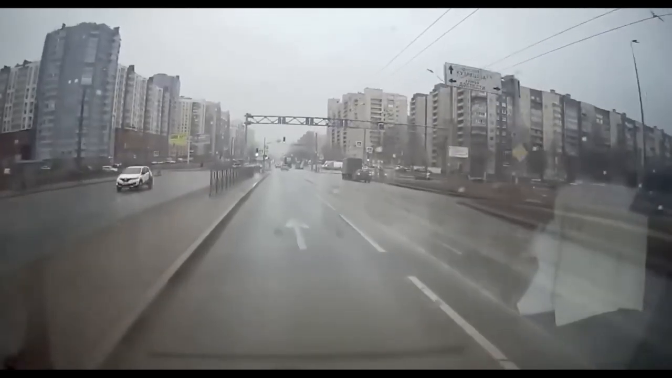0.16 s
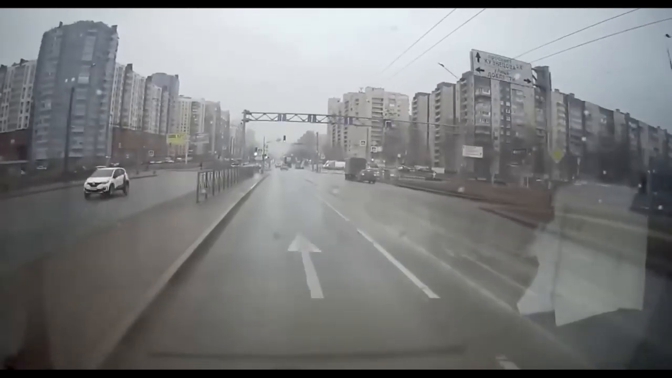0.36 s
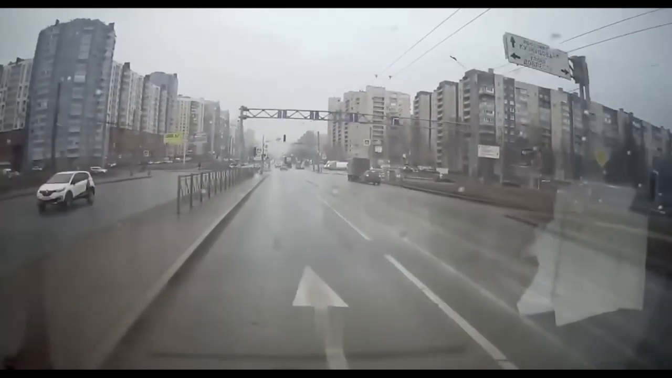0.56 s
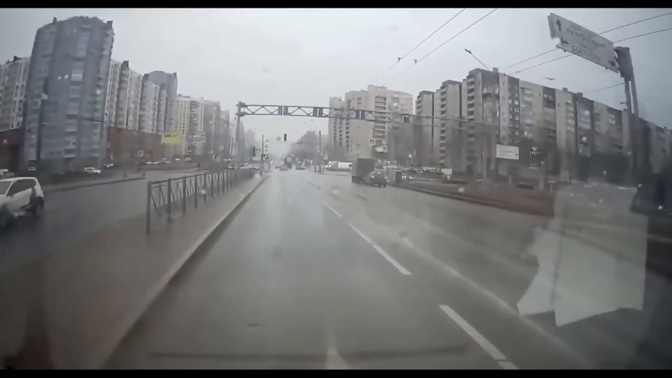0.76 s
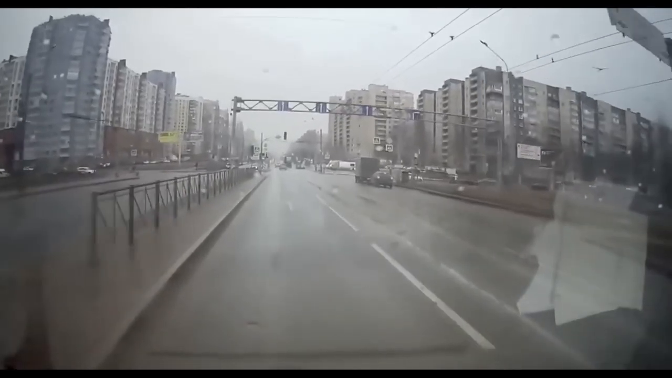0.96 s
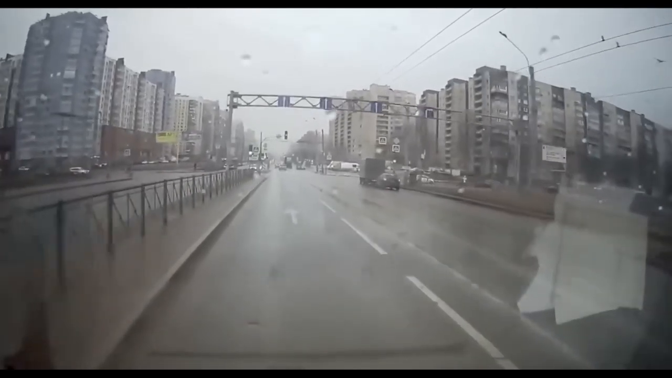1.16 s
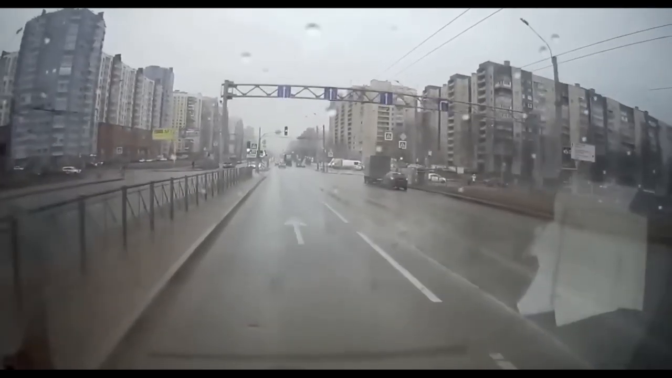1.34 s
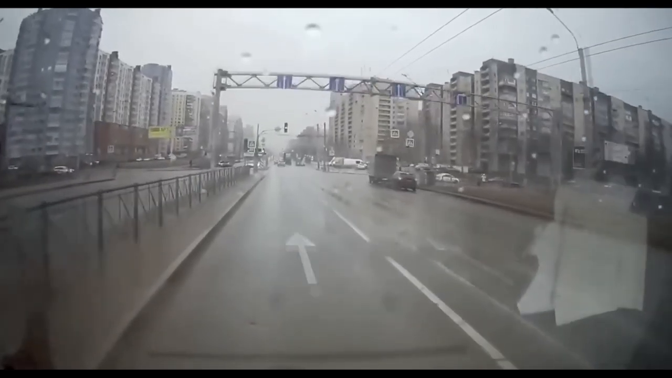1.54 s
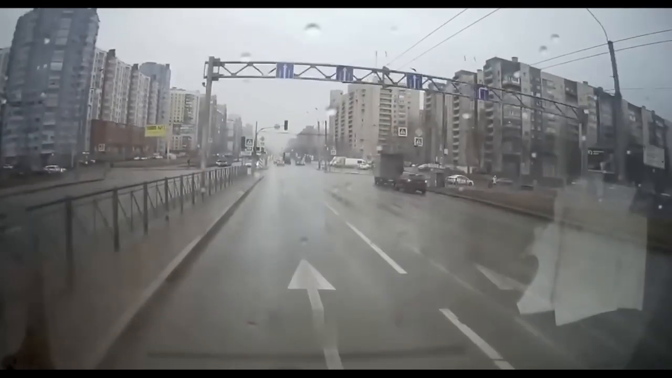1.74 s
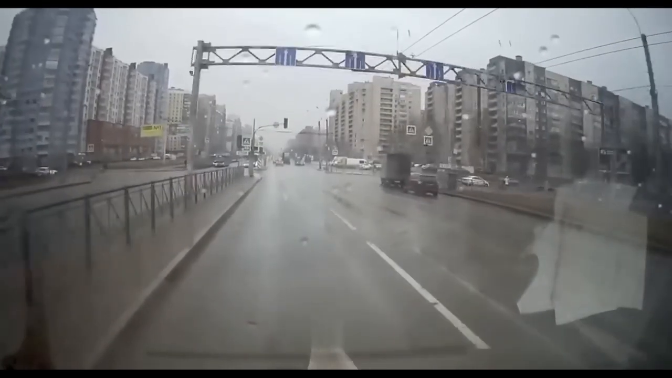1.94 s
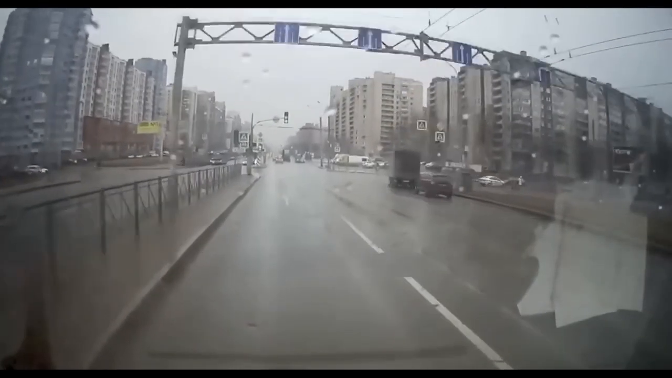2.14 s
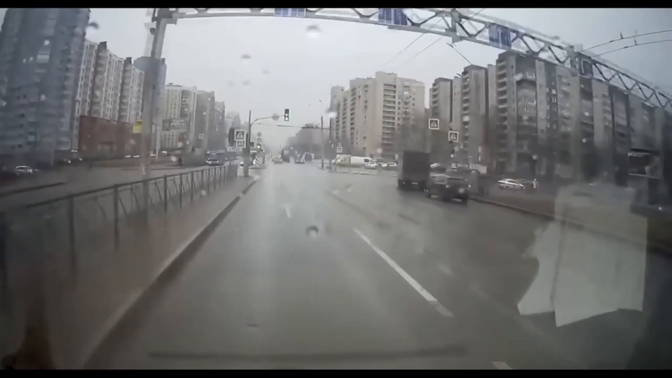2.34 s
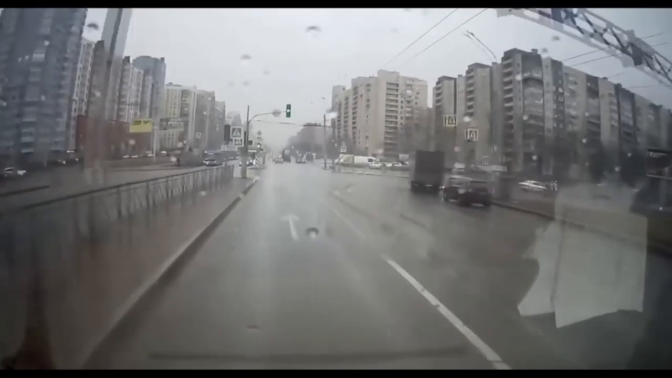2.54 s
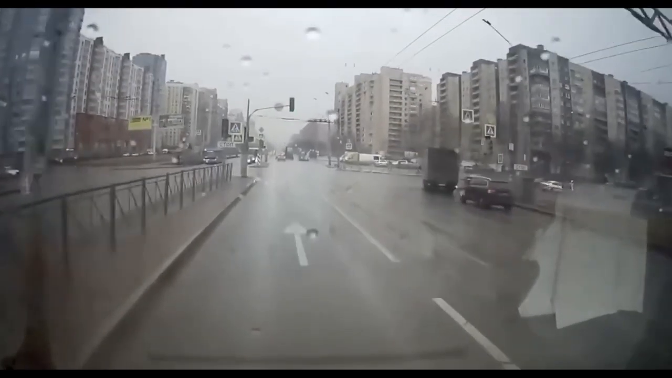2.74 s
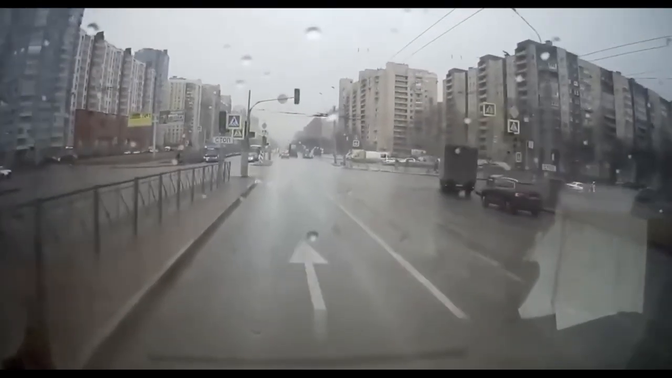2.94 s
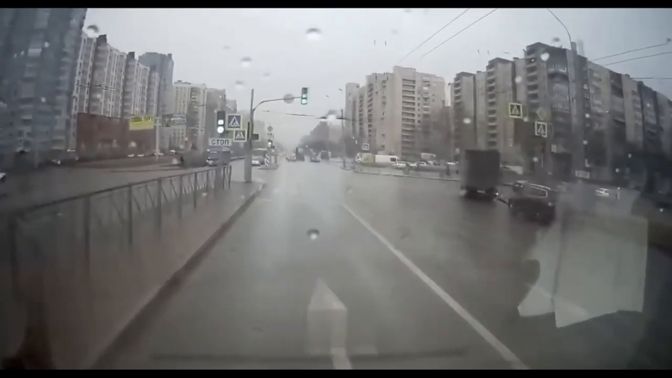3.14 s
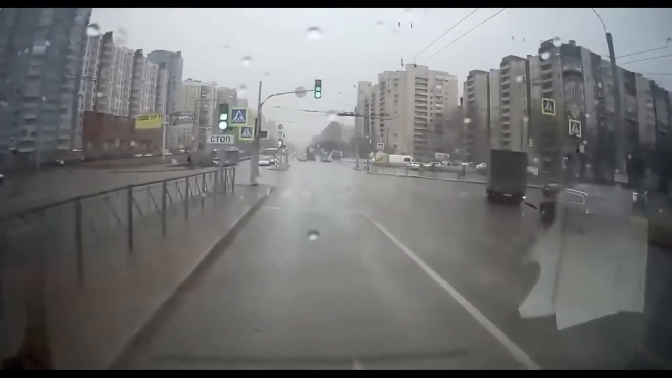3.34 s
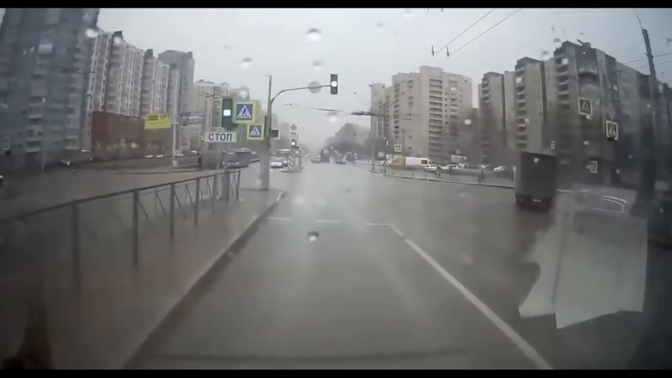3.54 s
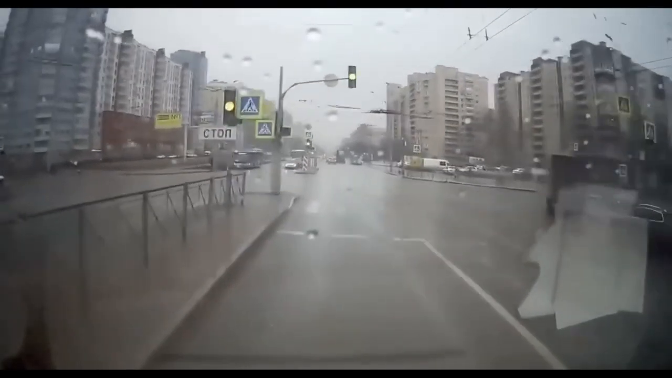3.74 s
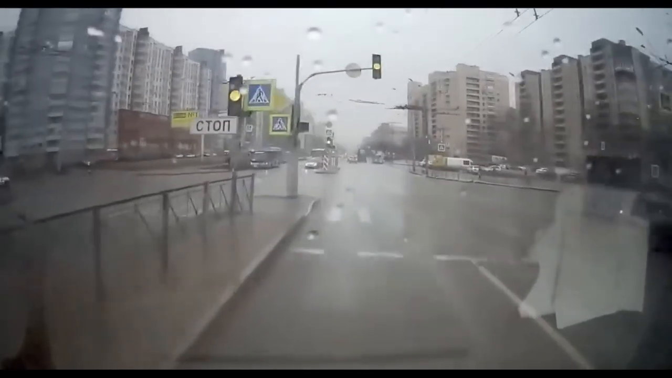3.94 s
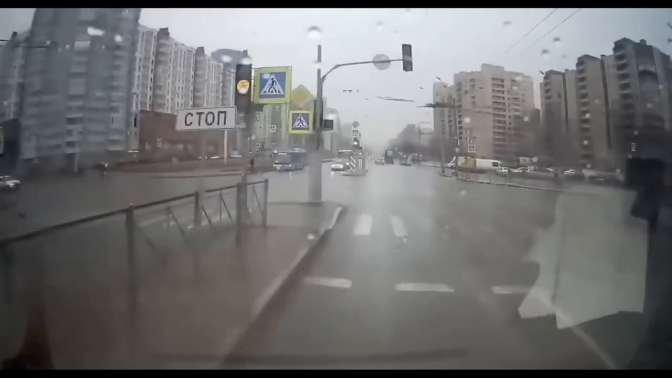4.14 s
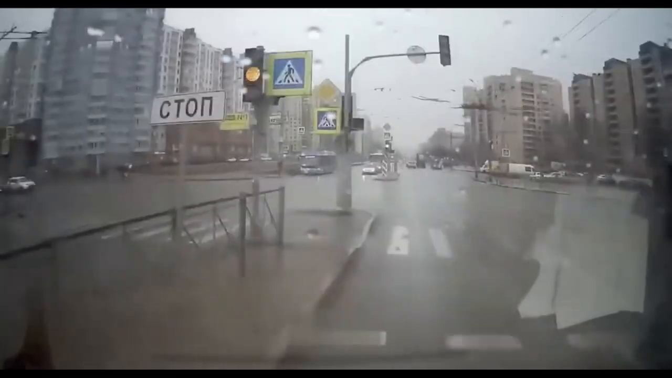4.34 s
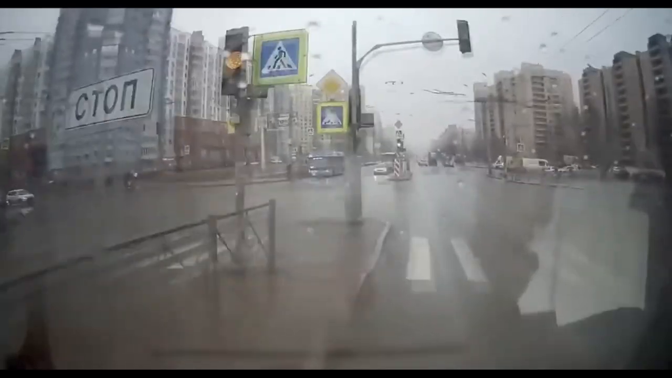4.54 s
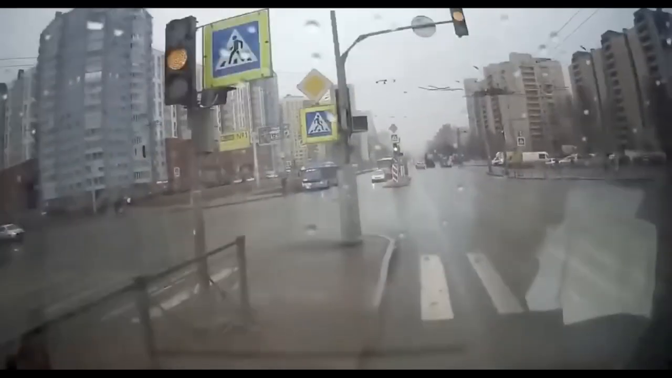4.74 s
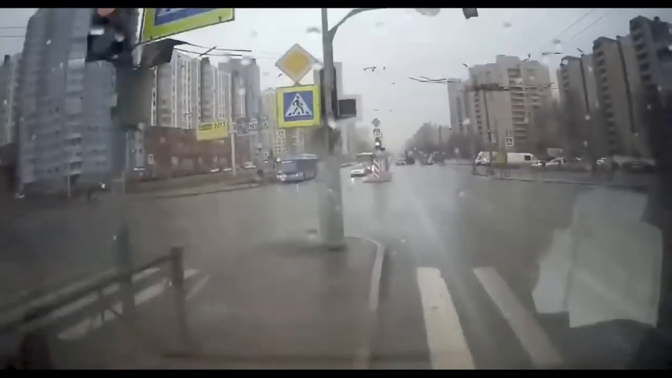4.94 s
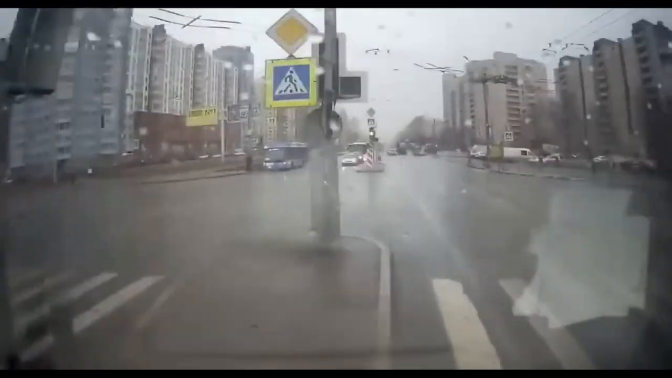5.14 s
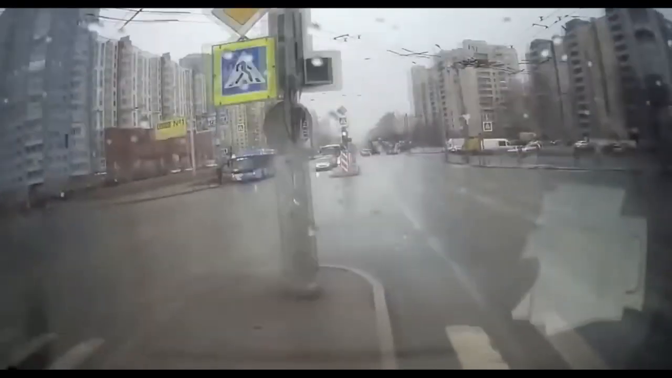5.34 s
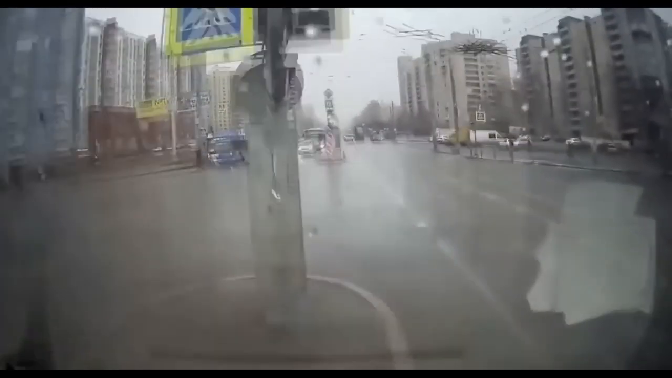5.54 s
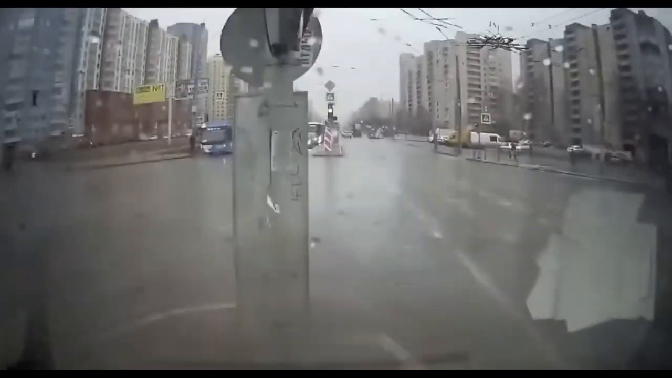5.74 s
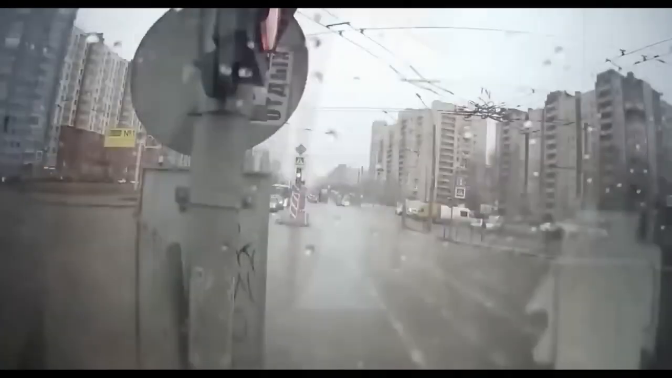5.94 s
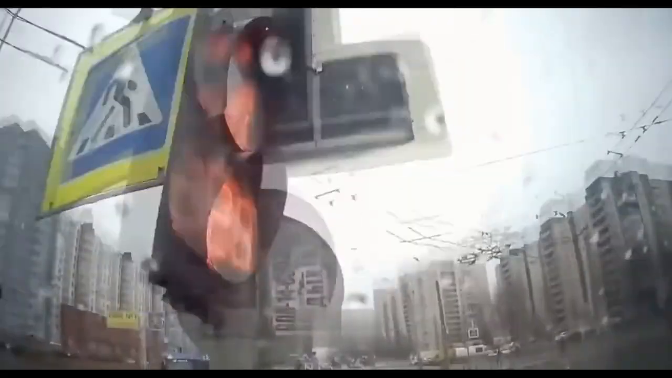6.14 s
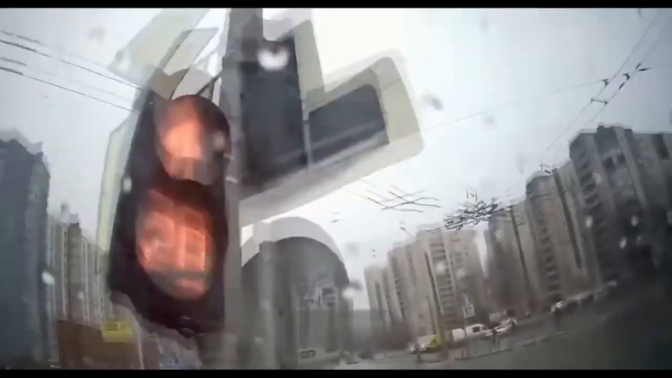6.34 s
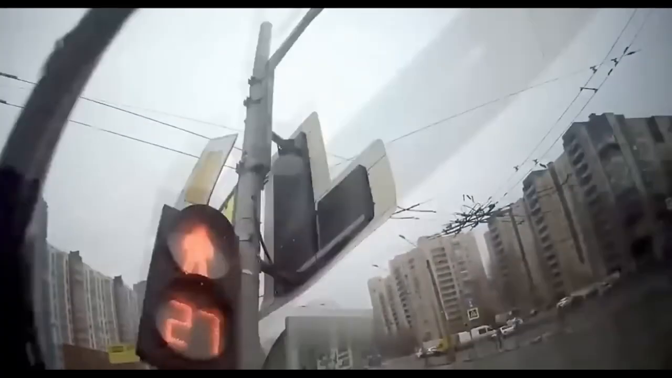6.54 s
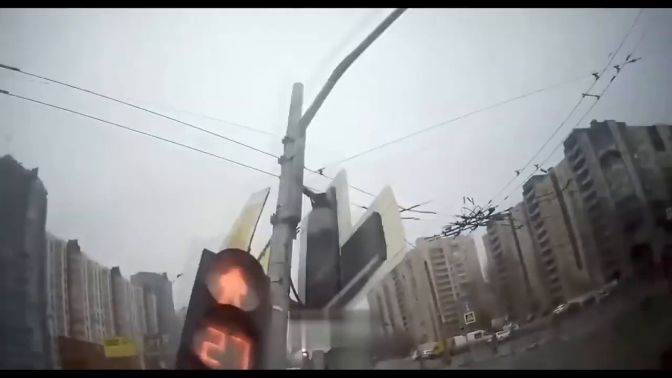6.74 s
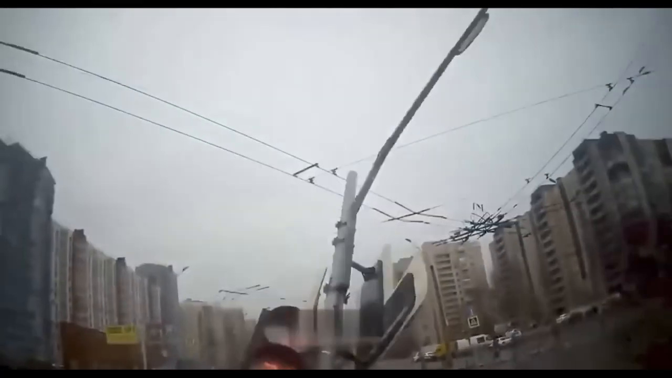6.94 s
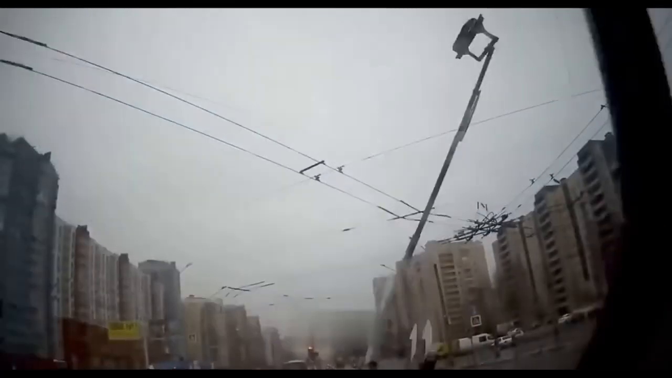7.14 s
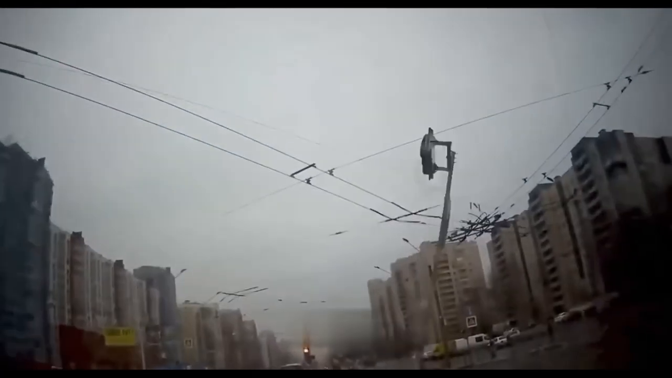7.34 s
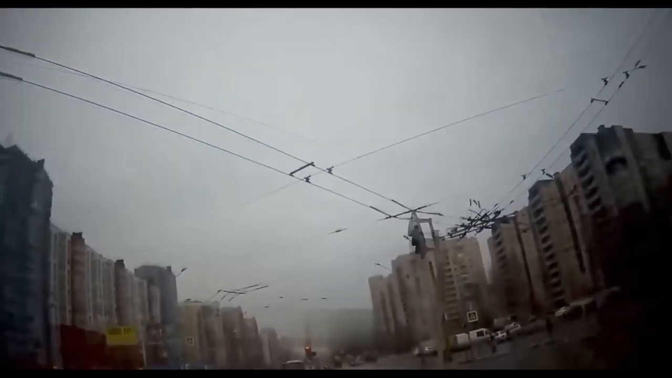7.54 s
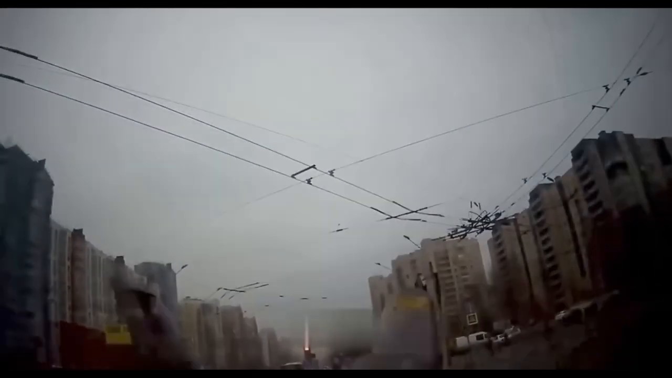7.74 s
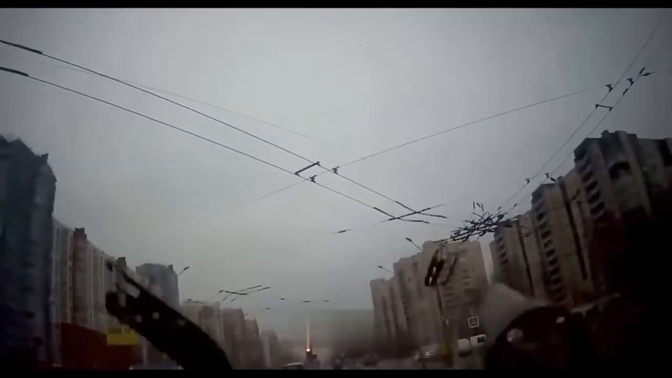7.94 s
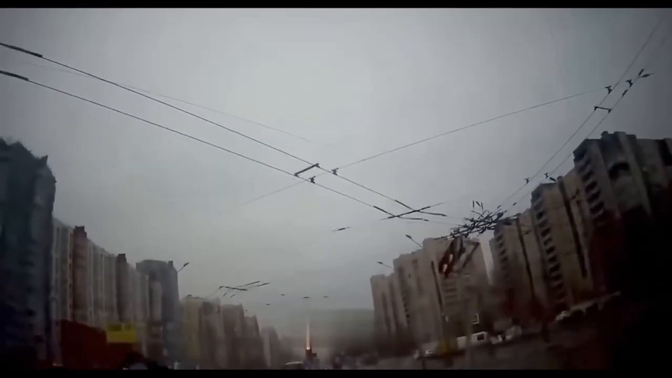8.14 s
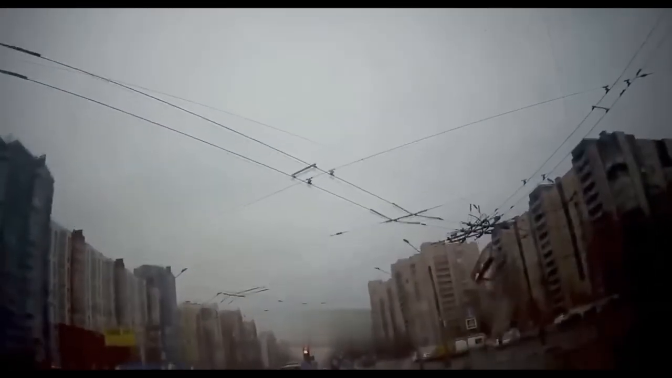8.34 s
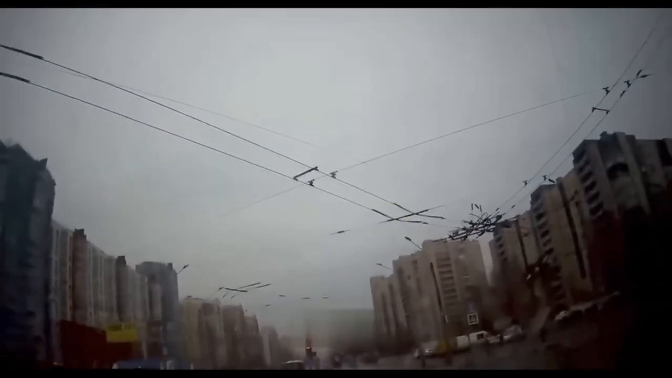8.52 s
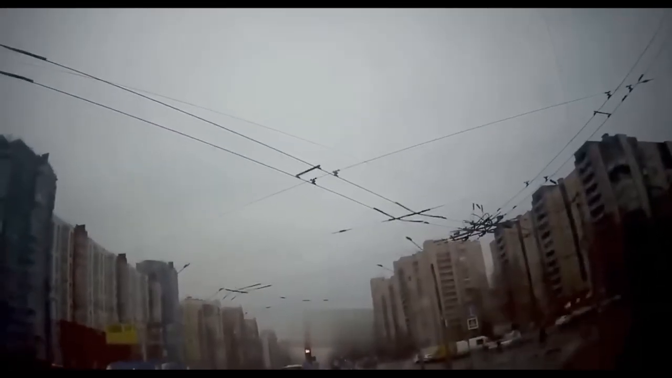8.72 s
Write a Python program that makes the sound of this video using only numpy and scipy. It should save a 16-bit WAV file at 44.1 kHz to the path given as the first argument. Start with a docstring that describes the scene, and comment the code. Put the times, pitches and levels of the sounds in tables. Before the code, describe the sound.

Inside a car on a wet road, low engine drone and tyre hiss, then knocks, a grinding clatter and a huge overloaded metallic crash, settling quickly.

```python
"""Inside a vehicle on a wet road: it brakes, mounts a kerb and knocks down a pole.
Harmonic sines make the engine drone and drive-line hums; filtered noise makes tyre roar, spray and heave.
Knocks and surges of grinding are noise bursts and ringing clicks coloured by the body; loose sheets rasp.
Panels and cabin air ring as damped resonators, and the sum overloads a small microphone."""
import sys
import numpy as np
from scipy import signal
from scipy.fft import rfft, irfft
from scipy.io import wavfile
from scipy.ndimage import uniform_filter1d

SR = 44100
rng = np.random.default_rng(int(sys.argv[2]) if len(sys.argv) > 2 else 0)


def undo_db(level):
    """Turn decibels back into plain size, where 20 dB means ten times bigger."""
    steps = np.asarray(level, float) / 20
    return 10 ** steps


def transcribe(u):
    """Save the signal u as a 16-bit wav file named by the first command-line argument.

    u: samples, shape (n,) or (channels, n), limited to [-1, 1]; the rate is SR.
    q: integer samples, one column per channel.
    """
    v = np.clip(np.atleast_2d(u).T, -1, 1)
    q = np.round(v * 32767).astype(np.int16)
    wavfile.write(sys.argv[1], SR, q)


N = 387198
TIME_S = np.arange(N) / SR

# Engine speed and strength: time_s, firing_hz, level_db (each order adds its own level)
ENGINE_COURSE = [(0, 64.64, -28.5), (2.95, 65.1, -25.5), (3.08, 64.24, -31), (3.75, 54.28, -36),
                 (3.87, 50.92, -26), (5.3, 44.44, -25.5), (5.5, 41.05, -47.5), (8.78, 40.8, -78)]
# Harmonics of the firing rate: multiple, level_db
FIRING_ORDERS = [(1, -1), (2, -15.5), (3, -18), (5, -28)]
# Steady drive-line hums while cruising: pitch_hz, level_db, end_s
DRIVE_LINE_HUMS = [(163, -38.5, 3.5), (278.6, -48.5, 2.5), (366.7, -51.5, 3.4)]
# Low-frequency motion of the closed cabin: time_s, sway_db, boom_db
HEAVE_COURSE = [(0, -28, -28), (3.9, -28, -29), (5.3, -16.5, -34.5), (5.5, -16.5, -17.5),
                (6.05, -22, -19.5), (6.3, -19, -22.5), (6.65, -21, -27.5), (6.93, -16, -25.5),
                (7.05, -7, -4), (7.3, -20, -13), (7.7, -15, -22.5), (7.9, -24, -27), (8.78, -25.5, -27)]
# Spectral density of rolling noise: frequency_hz, density_db (per Hz)
ROAD_SPECTRUM = [(35, -16.5), (60, -25.5), (85, -21), (109, -9.5), (170, -11), (237, -18), (450, -22),
                 (700, -27.5), (1190, -33.5), (1590, -46), (2440, -38.5), (3200, -45.5), (3850, -42),
                 (4700, -56.5), (7400, -63), (8200, -69.5), (17600, -120)]
# Spectral density coloured by body and cabin: frequency_hz, density_db (per Hz)
BODY_SPECTRUM = [(32, -39.5), (55, -0.5), (75, -2.5), (107, -2.5), (188, -4.5), (232, -18), (291, -15.5),
                 (1020, -31.5), (1860, -44), (2490, -34.5), (3200, -41), (3780, -35.5), (4950, -49.5),
                 (7360, -56.5), (8000, -58.5), (10400, -86), (17600, -120)]
# Knocks, strengths before the layer gains: start_s, crackle_db, crunch_over_crackle_db, thud_db,
# spread_s (sets both rise and decay)
KNOCK_EVENTS = [(1.981, -41, -2, -24, 0.037), (2.2315, -32.5, -3, -28, 0.0079),
                (2.295, -35.5, 0.5, -55.5, 0.0094), (4.908, -59, 1, -23, 0.0092),
                (5.182, -39, 8.5, -29.5, 0.018), (5.476, -30.5, -14, -52, 0.0098),
                (5.6235, -31.5, 0, -17, 0.014), (5.7094, -34.5, 8.5, -14.5, 0.011),
                (5.7694, -33.5, 4, -53, 0.021), (5.8616, -31, 1.5, -24, 0.016),
                (6.031, -22, -10, -20.5, 0.029), (6.116, -30.5, 3, -31, 0.036),
                (6.152, -42, 15.5, -23, 0.0049), (6.176, -38.5, 10, -23, 0.0057),
                (6.473, -24.5, -4.5, -24, 0.016), (6.488, -23, -0.5, -16, 0.032),
                (6.524, -27.5, -23, -39, 0.018), (6.8002, -32.5, 5.5, -26, 0.082),
                (6.952, -19.5, 8, -7, 0.03), (6.972, -1.5, -7.5, -11.5, 0.034), (7, 10, -24.5, -18, 0.0055),
                (7.1003, 0.5, -11.5, -6.5, 0.0098), (7.159, -5, -8, -22.5, 0.012),
                (7.2189, -6.5, -9.5, -17, 0.02), (7.275, -21.5, 6.5, -18.5, 0.01),
                (7.301, -18, -1.5, -10, 0.0099), (7.332, -19.5, -0.5, -21, 0.0089),
                (7.368, -21.5, -7.5, -33, .015), (7.4547, -23.5, -10.5, -19.5, 0.015),
                (7.5268, -23.5, -15, -15, 0.045), (7.574, -22.5, -8.5, -36.5, 0.022),
                (7.667, -22.5, -8, -29, 0.022), (8.219, -22.5, -35, -28, 0.011),
                (8.358, -40, 9, -21.5, 0.07), (8.424, -19.5, -24, -31.5, 0.008)]
# Panel resonances excited by thuds: frequency_hz, level_db, t60_s
PANEL_RESONANCES = [(190.5, -1.5, 0.15), (110, -5, 0.3), (160, -16, 0.038), (367.7, -13, 0.49),
                    (97.1, -4.5, 0.2)]
# Spells of grinding contact; each layer takes its share of the swing about -30 dB and of the
# brightness: start_s, length_s, start_db, end_db, brightness_db
GRINDING_SURGES = [(5.491, 0.52, -29.5, -39.5, -14), (6.034, 0.18, -22, -31, -16),
                   (6.407, 0.18, -36.5, -31, -10.5), (6.764, 0.13, -22.5, -30, -16),
                   (7.021, 0.12, -8, -5, -11), (7.199, 0.051, -15, -11, -6), (7.251, 0.24, -24, -24, -14.5),
                   (7.638, 0.5, -31.5, -40, -8.5), (8.371, 0.28, -27, -34.5, -21)]
# Pushes on the whole body: time_s, air_push_db, suspension_push_db
BODY_JOLTS = [(5.506, -6.5, -13.5), (5.586, -12.5, -9.5), (5.656, -22, -12), (6.006, -6, -33),
              (6.035, -3, -30), (6.133, -12, -12), (6.751, -6, -18), (6.977, -25.5, 2), (7.032, 6, -20),
              (7.161, 1.5, 2.5), (7.224, 0.5, -23.5), (7.248, -11, 8), (7.311, -18, -6),
              (7.577, -5.5, -16.5), (7.97, -10.5, -48), (8.342, -8, -25)]
# Lengthwise cabin air mode, then suspension bounce: frequency_hz, t60_s
BODY_RESONANCES = [(32.85, 0.43), (16.96, 0.16)]
# Struck sheet-metal panels: start_s, pitch_hz, level_db, t60_s (divided by the partial's multiple)
PANEL_CLANGS = [(6.033, 1160, -21.5, 0.046), (6.153, 600, -22, 0.028), (6.488, 201, -17.5, .15),
                (6.49, 630, -22, 0.17), (6.975, 782, -8, .15), (7.048, 631, -5, 0.089),
                (7.181, 1007, -7.5, .16), (7.375, 2334, -23, 0.051), (7.84, 448, -22.5, 0.11),
                (8.224, 1070, -25, 0.042)]
# Partials of a struck panel: multiple, level_db
PANEL_PARTIALS = [(1.001, -3), (1.141, -5), (2.199, -16)]
# Loose sheets dragged over the road: start_s, length_s, centre_hz, width_hz, start_db
DRAGGED_SHEETS = [(7.45, 0.63, 3840, 220, -43), (7.798, 0.24, 290, 30, -35), (8.755, .1, 2310, 930, -44.5)]

ROAR_DB, SPRAY_DB = -42.5, -46   # rms in 251-1100 Hz and 608-5600 Hz, before flicker
ROUGH_START_S, ROUGH_LENGTH_S, ROUGH_DB = 2.0, 0.96, -43.5
PUDDLE_START_S, PUDDLE_DB, PUDDLE_FADE_DB_PER_S = 3.84, -42.5, 7.5
JUDDER_START_S, JUDDER_LENGTH_S, JUDDER_DB = 3.4, 0.78, -26.5
JUDDER_HZ, JUDDER_SAG_HZ_PER_S = 19, 0.98
SCRAPE_HZ, SCRAPE_WIDTH_HZ, SCRAPE_DB = 3754, 200, -4   # singing band, level relative to the hiss
DRAG_SAG_DB_PER_S, DRAG_EDGE_DB_PER_S, DRAG_FLICKER_DB = 5.5, 500, 2
CLIP_LEVEL, OVERLOAD_SLOPE = 0.409, 0.08   # threshold, share of the excess that still passes
CUTOFF_HZ, LEAK_DB = 7950, -11.5
CEILING, FADE_S = 0.49, 0.006


def rms_one(x):
    """Normalization: scale a signal to unit root-mean-square value."""
    return x / np.sqrt(np.mean(x ** 2) + 1e-20)


def in_time(rows):
    """Linear interpolation: the columns of a time table at every sample."""
    time_s, *columns = np.transpose(rows)
    return [np.interp(TIME_S, time_s, column) for column in columns]


def drift(rate_hz):
    """Slow random fluctuation: noise through a double real pole at rate_hz, with unit rms."""
    step = 40   # samples between computed points
    pole = np.exp(-2 * np.pi * rate_hz * step / SR)
    noise = rng.standard_normal(N // step + 2002)
    slow = rms_one(signal.lfilter([1], [1, -2 * pole, pole ** 2], noise)[2000:])
    return np.interp(np.arange(N) / step, np.arange(len(slow)), slow)


def band(x, low_hz, high_hz, order=2):
    """Band limitation: a Butterworth band-pass."""
    return signal.sosfilt(signal.butter(order, [low_hz, high_hz], "band", fs=SR, output="sos"), x)


def low_pass(x, cutoff_hz):
    """High-frequency loss: a second-order Butterworth low-pass."""
    return signal.sosfilt(signal.butter(2, cutoff_hz, fs=SR, output="sos"), x)


def colour(x, spectrum):
    """Minimum phase: folding the cepstrum gives a causal filter with the tabulated spectrum."""
    size = 2 ** 14
    table_hz, table_db = np.transpose(spectrum)
    grid_hz = np.maximum(np.arange(size // 2 + 1) * SR / size, 1)
    gain = undo_db(np.interp(np.log(grid_hz), np.log(table_hz), table_db))
    cepstrum = irfft(np.log(gain))
    cepstrum[1:size // 2] *= 2
    cepstrum[size // 2 + 1:] = 0
    return signal.fftconvolve(x, irfft(np.exp(rfft(cepstrum))))[:N]


def tone(pitch_hz, waver_db, waver_hz):
    """Frequency and amplitude modulation: a sine wavering randomly about a pitch and unit rms."""
    phase = 2 * np.pi * np.cumsum(pitch_hz + waver_hz * drift(2.38)) / SR
    return np.sqrt(2) * np.sin(phase) * undo_db(waver_db * drift(2.8))


def ring(blows, pitch_hz, t60_s):
    """Damped resonance: a unit click excites a decaying sine of initial height 1."""
    radius = undo_db(-60 / (t60_s * SR))
    angle = 2 * np.pi * pitch_hz / SR
    feedback = [1, -2 * radius * np.cos(angle), radius ** 2]
    return signal.lfilter([0, np.sin(angle)], feedback, blows + 1e-18)


def spell(start_s, length_s, start_db, end_db, rise_db_per_s=352.5, fall_db_per_s=199.5):
    """Exponential envelope: a level in dB that rises, slides from start to end, then falls."""
    t = TIME_S - start_s
    held_db = np.interp(t, [0, max(length_s, .01)], [start_db, end_db])
    return held_db + rise_db_per_s * np.minimum(t, 0) - fall_db_per_s * np.maximum(t - length_s, 0)


def engine():
    """Harmonic series: low orders of the firing rate, the higher ones less steady."""
    firing_hz, level_db = in_time(ENGINE_COURSE)
    orders = sum(undo_db(order_db) * tone(k * firing_hz, 1.4 + 0.61 * k, 0.13 * k)
                 for k, order_db in FIRING_ORDERS)
    return undo_db(level_db) * orders


def drive_line_hums():
    """Tonal radiation: steady rotation sounds as nearly pure tones, each with its own end."""
    return sum(undo_db(spell(0, end_s, level_db, level_db)) * tone(pitch_hz, 1.03, 0.32)
               for pitch_hz, level_db, end_s in DRIVE_LINE_HUMS)


def heave():
    """Volume pumping: the suspension drives the closed cabin's air in two low bands of noise."""
    sway_db, boom_db = in_time(HEAVE_COURSE)
    out = 0
    for level_db, low_hz, high_hz, span_s in ((sway_db, 9, 21, .12), (boom_db, 24, 48, .07)):
        motion = rms_one(band(rng.standard_normal(N + SR), low_hz, high_hz)[SR:])
        swing = uniform_filter1d(motion ** 2, int(span_s * SR)) + 0.024
        evened = rms_one(motion / swing ** 0.28)   # partly evens the random level swing
        out = out + undo_db(level_db) * evened
    return out


def rolling():
    """Broadband contact noise: tyre roar below, water spray above, each with its own flicker."""
    noise = colour(rng.standard_normal(N), ROAD_SPECTRUM)
    low = low_pass(noise, 700)
    roar = low / np.std(band(noise, 251, 1100, order=4))
    spray = (noise - low) / np.std(band(noise, 608, 5600, order=4))
    roar = roar * undo_db(ROAR_DB + 1.4 * drift(8))
    spray = spray * undo_db(SPRAY_DB + 0.9 * drift(10))
    water = colour(rng.standard_normal(N), ROAD_SPECTRUM)
    # a rougher stretch adds a duller roar
    rough_db = spell(ROUGH_START_S, ROUGH_LENGTH_S, ROUGH_DB, ROUGH_DB, 60, 30)
    rough = rms_one(band(water, 210, 1300)) * undo_db(rough_db)
    # a wetter stretch throws brighter spray, fading until the end
    puddle_end_db = PUDDLE_DB - PUDDLE_FADE_DB_PER_S * N / SR
    puddle_db = spell(PUDDLE_START_S, N / SR, PUDDLE_DB, puddle_end_db)
    splash = rms_one(band(water, 817, 1130)) + undo_db(-3.5) * rms_one(band(water, 1600, 3800))
    return roar + spray + rough + splash * undo_db(puddle_db + drift(9))


def knocks():
    """Impact excitation: short bursts of crackle pass the body while soft thuds ring panel modes."""
    crackle_burst, crunch_burst = np.zeros(N), np.zeros(N)
    t = np.arange(int(.15 * SR)) / SR
    for start_s, crackle_db, crunch_db, _, spread_s in KNOCK_EVENTS:
        at, spread_s = round(start_s * SR), max(spread_s, .002)
        bite = 1 - np.exp(-t / (0.27 * spread_s))
        shape = (2 * bite * np.exp(-1.3 * t / spread_s))[:N - at]
        crackle_burst[at:at + len(t)] += undo_db(crackle_db) * shape
        crunch_burst[at:at + len(t)] += undo_db(crackle_db + crunch_db) * shape
    # knocks are brighter than the clatter, by 1 dB per octave
    bright_body = [(hz, db + np.log2(hz / 1000)) for hz, db in BODY_SPECTRUM]
    grit = rng.standard_normal(N) * undo_db(2.5 * drift(120))   # noise of uneven level
    scale = np.std(band(colour(grit, bright_body), 1000, 7000, order=4))
    crackle = band(colour(crackle_burst * grit, bright_body), 450, 7000) / scale
    crunch = band(colour(crunch_burst * grit, bright_body), 280, 1800) / scale
    at = [round(row[0] * SR) for row in KNOCK_EVENTS]
    thud_db = np.array([row[3] for row in KNOCK_EVENTS])
    thuds = np.zeros(N)
    for pitch_hz, mode_db, t60_s in PANEL_RESONANCES:
        blows = np.zeros(N)
        blows[at] = undo_db(thud_db + mode_db + rng.normal(0, 3.5, len(at)))
        thuds += ring(low_pass(blows, 330), pitch_hz, t60_s)   # soft contact
    return undo_db(-6.5) * (crackle + crunch) + undo_db(-0.5) * thuds


def judder():
    """Low-frequency vibration: an unsteady tone whose pitch slowly sags."""
    pitch_hz = JUDDER_HZ - JUDDER_SAG_HZ_PER_S * (TIME_S - JUDDER_START_S)
    level_db = spell(JUDDER_START_S, JUDDER_LENGTH_S, JUDDER_DB, JUDDER_DB)
    return undo_db(level_db) * tone(pitch_hz, 6.4, 0.132)


def surge_gain(level_db, follows, brightness):
    """Power summation: all surges combined into the gain of one crash layer."""
    power = 0
    for *course, surge_brightness_db in GRINDING_SURGES:
        swing_db = follows * (spell(*course) + 30)
        power = power + undo_db(level_db - 30 + swing_db + brightness * surge_brightness_db) ** 2
    return np.sqrt(power)


def crash():
    """Random impacts: clumped clicks ring small pieces of trim and debris, coloured by the body."""
    clumps = undo_db(2.5 * drift(20) + 1.5 * drift(70))
    sizes = undo_db(3.37 * np.minimum(rng.exponential(1, N), 5)) * rng.choice([-1, 1], N)
    clicks = sizes * (rng.random(N) < 2200 * clumps / SR)   # 2200 per second times the clumping
    pitches_hz = np.geomspace(250, 7000, 30)
    piece_hit = rng.integers(0, 30, N)
    pieces = sum(ring(clicks * (piece_hit == k), hz, 45.0 / hz) * np.sqrt(hz)
                 for k, hz in enumerate(pitches_hz))
    grinding = 0.91 * np.sqrt(clumps) * rng.standard_normal(N)
    noise = colour(rms_one(pieces) + grinding, BODY_SPECTRUM)
    rumble = low_pass(noise, 500)
    clatter = band(noise, 616, 3200)
    hiss = signal.sosfilt(signal.butter(4, 3000, "high", fs=SR, output="sos"), noise)
    # the scraping hiss sings in one band
    singing = band(noise, SCRAPE_HZ - SCRAPE_WIDTH_HZ / 2, SCRAPE_HZ + SCRAPE_WIDTH_HZ / 2)
    hiss = rms_one(hiss) + undo_db(SCRAPE_DB) * rms_one(singing)
    return (surge_gain(4, 0.87, 0) * rms_one(rumble)
            + surge_gain(0, 0.83, 0) * rms_one(clatter)
            + surge_gain(0, 0.92, 0.98) * rms_one(hiss))


def jolts():
    """Modal excitation: soft pushes ring the lengthwise cabin air mode and the suspension bounce."""
    at = [round(row[0] * SR) for row in BODY_JOLTS]
    out = 0
    for column, (pitch_hz, t60_s) in enumerate(BODY_RESONANCES, start=1):
        pushes = np.zeros(N)
        pushes[at] = undo_db([row[column] for row in BODY_JOLTS])
        out = out + ring(low_pass(pushes, 80), pitch_hz, t60_s)
    return out


def clangs():
    """Inharmonic vibration: a few uneven touches within 15 ms ring the partials of each panel."""
    out = np.zeros(N)
    for start_s, pitch_hz, level_db, t60_s in PANEL_CLANGS:
        late = rng.random(4)
        touches = (np.sort(late - late.min()) * .015 * SR).astype(int)
        blows = np.zeros(SR // 2)
        blows[touches] = [1, -.6, .5, .3]
        partials = sum(undo_db(level_db + partial_db) * ring(blows, k * pitch_hz, t60_s / k)
                       for k, partial_db in PANEL_PARTIALS)
        at = round(start_s * SR)
        out[at:at + SR // 2] += partials[:N - at]
    return out


def drags():
    """Sliding friction: loose sheets dragged over the road rasp as narrow bands of noise."""
    rasp = rng.standard_normal(N)
    out = 0
    for start_s, length_s, centre_hz, width_hz, start_db in DRAGGED_SHEETS:
        end_db = start_db - DRAG_SAG_DB_PER_S * length_s
        level_db = spell(start_s, length_s, start_db, end_db, DRAG_EDGE_DB_PER_S, DRAG_EDGE_DB_PER_S)
        sheet = rms_one(band(rasp, centre_hz - width_hz / 2, centre_hz + width_hz / 2))
        out = out + undo_db(level_db + DRAG_FLICKER_DB * drift(5.1)) * sheet
    return out


def scene():
    """Superposition: the pressures of all sources add at one microphone in the cabin."""
    cruising = engine() + drive_line_hums() + heave() + rolling()
    impact = knocks() + judder() + crash() + jolts() + clangs() + drags()
    return (cruising + impact)[None]


def top_cut(x):
    """Nothing passes above the cut-off."""
    return signal.sosfilt(signal.butter(12, 16510, fs=SR, output="sos"), x)


def record(dry):
    """Amplitude limiting: a nearly flat overload, low-passed with a slight leak, capped and faded out."""
    clipped = np.clip(dry, -CLIP_LEVEL, CLIP_LEVEL)
    clipped = clipped + OVERLOAD_SLOPE * (dry - clipped)
    low = signal.sosfilt(signal.cheby1(8, .5, CUTOFF_HZ, fs=SR, output="sos"), clipped)
    leaked = low + undo_db(LEAK_DB) * (clipped - low)   # a trace of the splatter above the cut
    capped = np.clip(leaked, -CEILING, CEILING)   # trims the filter's ringing
    remaining_s = np.arange(N)[::-1] / SR
    fade = np.sin(np.pi / 2 * np.minimum(remaining_s / FADE_S, 1)) ** 2
    return top_cut(fade * capped)


dry = scene()
out = record(dry)
transcribe(out)
```